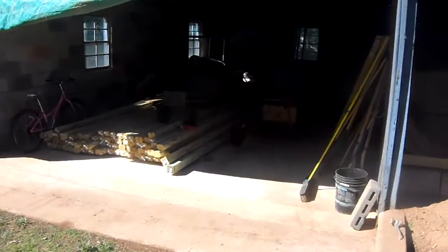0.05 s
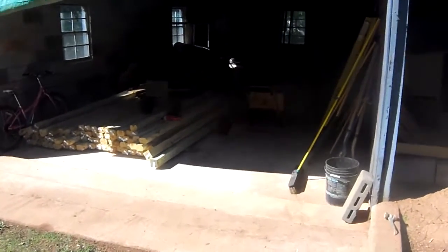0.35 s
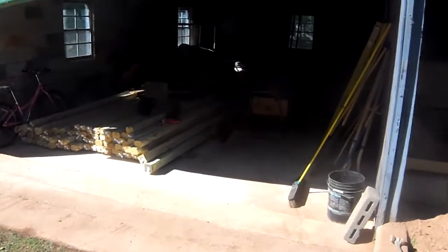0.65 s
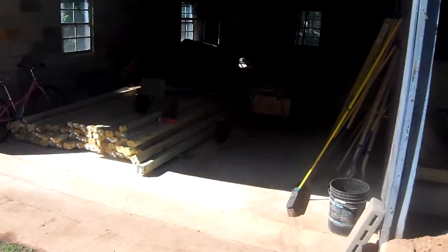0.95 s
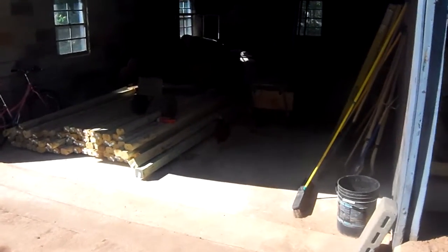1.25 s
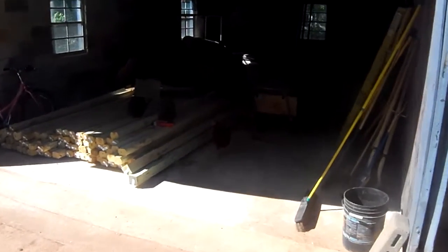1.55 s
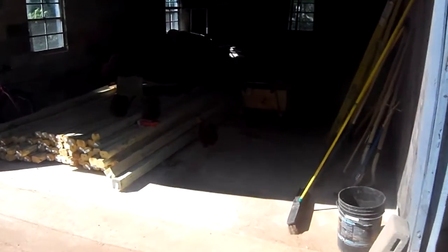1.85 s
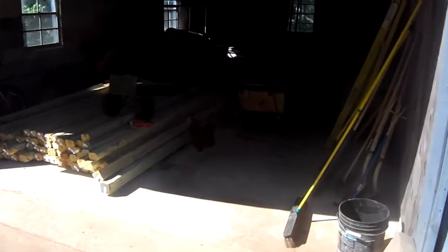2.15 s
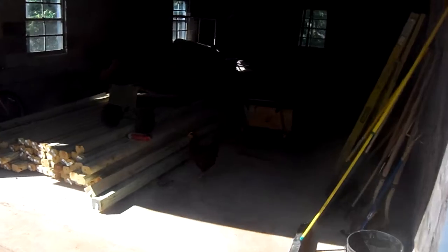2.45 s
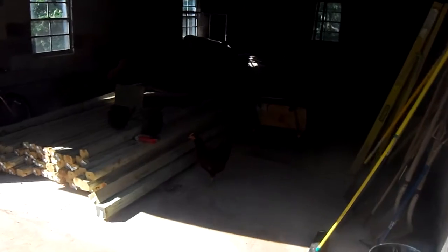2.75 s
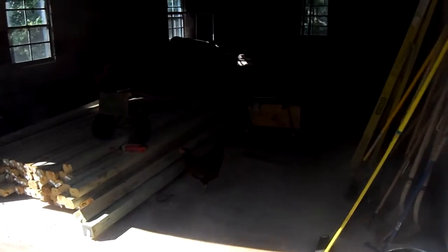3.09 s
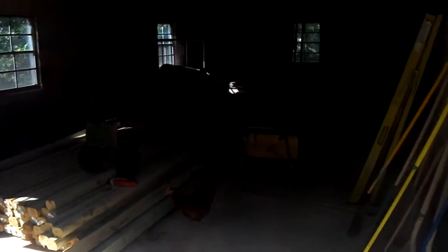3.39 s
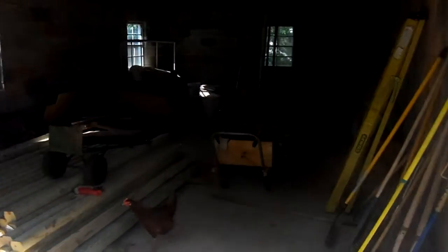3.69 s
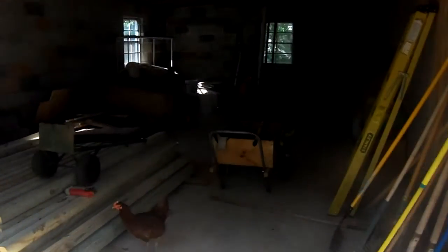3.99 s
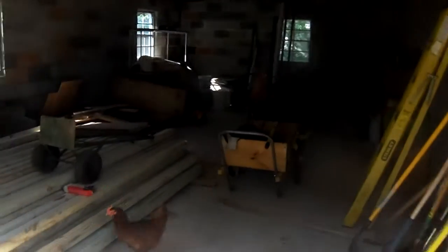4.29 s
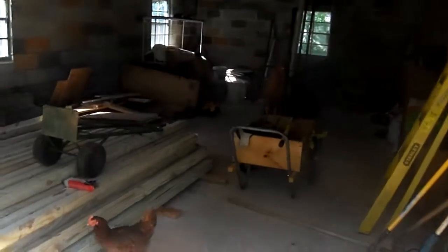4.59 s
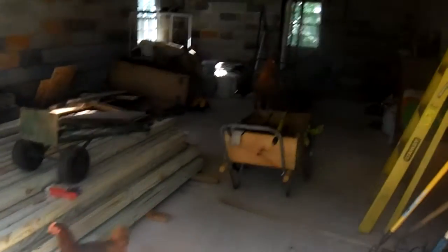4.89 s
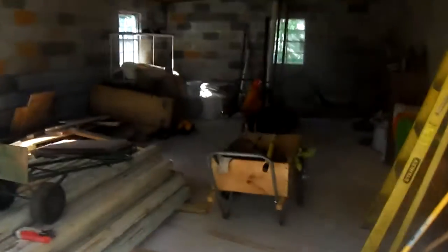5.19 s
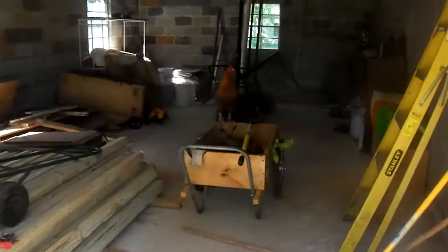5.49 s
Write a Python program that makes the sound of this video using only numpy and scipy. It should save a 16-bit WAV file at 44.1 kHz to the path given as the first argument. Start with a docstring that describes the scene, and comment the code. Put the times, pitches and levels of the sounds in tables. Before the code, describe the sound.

A hen clucks right at the start, then lets out a loud, drawn-out squawk from about 0.1 to 0.5 seconds, harsh at first, clearing to a tone and cracking upward at its end. A lull follows, with one soft cluck near 0.8 seconds. From 1.7 seconds she scolds in an even run of about five clucks a second, growing hoarser, louder from around 3.7 seconds, and continuing until the end at about 5.6 seconds. A second hen gives a short, level wail from 3.4 to 3.7 seconds, with a soft low note on either side. The concrete-block shed adds a short echo to the birds. Thin, dry ticks of grit come now and then, clearest near the end. Between 0.9 and 2.5 seconds a few distant songbirds chirp very faintly, and a quiet outdoor hush lies underneath throughout.

```python
"""Hens in a concrete-block shed, each voice a vibrating syrinx ringing through throat and beak.
One clucks, then lets out a long squawk that starts harsh, clears and cracks upward at its end.
After a lull with one more cluck, she scolds from 1.7 s: five hoarse clucks a second, louder later on.
At 3.4 s a second hen joins with a short, level wail. All along the walls answer, grit ticks now and
then, and a few distant songbirds chirp over a faint outdoor hush."""
import sys
import numpy as np
from scipy import signal
from scipy.fft import rfft, irfft, next_fast_len
from scipy.io import wavfile
from scipy.ndimage import uniform_filter1d, map_coordinates

SR = 44100
rng = np.random.default_rng(int(sys.argv[2]) if len(sys.argv) > 2 else 0)


def store_wav(level_fs):
    """Save 16-bit WAV to argv[1]."""
    pcm = np.round(np.clip(np.atleast_2d(level_fs), -1, 1) * 32767)
    wavfile.write(sys.argv[1], SR, pcm.T.astype(np.int16))


N = 253134
TOP_HZ = 14200

SQUAWK_S, PUSH_S, CRACK_S, SQUAWK_END_S = .132, .452, .477, 0.52
NOTE_HZ, NOTE_RISE_HZ_PER_S, NOTE_DB = 532.5, 108, -27.5
BURST_PEAK_S, BURST_HZ, BURST_DB = .031, 75.5, 11  # opening burst: time to peak, added pitch and level
PUSH_RISE_S, PUSH_HZ, PUSH_DB, PUSH_OPEN_DB = 0.0098, 24.2, 7, 2.5  # second push and what it adds
CRACKED_HZ, CRACKED_DB = 690, 1.5  # the crack: landing pitch, added level
BEAK_OPEN_DB, BEAK_CLOSE_DB_PER_S, BEAK_SHUT_DB = 2, 138, -22.5  # the mids dull as the beak closes
RASP_DB, RASP_FADE_DB_PER_S = -12.5, 44
# throat resonances that colour the squawk: f/Hz, width/Hz, level/dB
SQUAWK_FORMANTS = [(640, 162, 7), (1215, 570, -3.5), (1704, 235, 2.5), (2430, 350, -18), (2730, 500, -7.5),
                   (3410, 320, -6), (3720, 380, -8), (4920, 210, -13.5), (6100, 2100, -27.5),
                   (8800, 1000, -34.5), (11100, 2100, -30.5)]


def squawk(bounce_s=(.0019, .0027), attack_s=0.00058, release_s=0.014, snap_s=0.0048):
    """A harsh burst settles on a clean note, which rises and cracks upward under a second push."""
    t = np.arange(SQUAWK_S, SQUAWK_END_S + .05, 1 / SR)
    age = t - SQUAWK_S
    burst = (age / BURST_PEAK_S * np.exp(1 - age / BURST_PEAK_S)) ** 1.577
    harsh = 1 - after(age, .064, 0.0194)  # the membranes flap chaotically, then lock
    push, cracked = after(t, PUSH_S, PUSH_RISE_S), after(t, CRACK_S, snap_s)
    note = NOTE_HZ + NOTE_RISE_HZ_PER_S * age + BURST_HZ * burst * harsh + PUSH_HZ * push ** 2
    pitch = (note + (CRACKED_HZ - note) * cracked) * (1 + .0015 * wobble(len(t), 50))
    rough = np.clip(.022 + 0.86 * harsh + .38 * cracked, 0, 1) ** 1.5
    gate = (1 - np.exp(-age / attack_s)) * (1 - after(t, SQUAWK_END_S, release_s))
    level = amp(NOTE_DB + BURST_DB * burst + PUSH_DB * push + CRACKED_DB * cracked) * gate
    open_db = np.maximum(BEAK_OPEN_DB - BEAK_CLOSE_DB_PER_S * age, BEAK_SHUT_DB) + PUSH_OPEN_DB * push
    call = resonate(syrinx(pitch, rough, jitter=0.053), SQUAWK_FORMANTS, low_hz=525)
    overtones = filtered(call, lambda hz: above(hz, 2900, order=4))
    # the beak rings as it opens for the second push
    ring = amp(-10) * unit(resonate(overtones, [(2913, 250, 0)])) * push * (1 - cracked)
    # the floor bounce shifts as she moves her head, so single overtones swell and fade
    samples = np.arange(len(call))
    bounce = np.interp(samples - np.linspace(*bounce_s, len(call)) * SR, samples, overtones)
    body, bright, top = map(unit, registers(call + .6 * bounce, 2450, 4500))
    rasp = amp(RASP_DB - RASP_FADE_DB_PER_S * age) * top
    out = np.zeros(N)
    add(out, SQUAWK_S, level * (body + ring + amp(open_db) * bright + rasp))
    return out


# cluck cues, one push of air each: t/s, level/dB, beak opening/dB, length/s
CLUCK_CUES = [(-0.018, -18.5, -1, 0.034), (0.078, -36, -7.5, 0.06), (0.75, -28, -6, 0.022),
              (1.732, -30.5, -4.5, .035), (1.934, -27.5, 0, 0.028), (2.131, -28, -2.5, 0.035),
              (2.321, -34, 1, 0.051), (2.514, -30, -1.5, 0.051), (2.713, -29.5, 2.5, .043),
              (2.908, -31, 2.5, 0.05), (3.11, -28, 1, 0.041), (3.313, -32, -0.5, 0.06),
              (3.527, -29, 3, 0.045), (3.726, -23, 5, 0.03), (3.932, -26, 2.5, 0.049),
              (4.135, -24, 2.5, 0.042), (4.349, -21, 0, 0.035), (4.55, -23, 1.5, 0.04),
              (4.753, -22, 0.5, 0.036), (4.947, -27, 0, 0.05), (5.141, -24.5, 1, 0.052),
              (5.336, -22.5, 0.5, 0.037), (5.538, -25, 2.5, 0.041)]


def clucking(hoarsest=0.551, hoarsen_s=1.51):
    """The first clucks are clear-toned; the scolding after the squawk grows hoarse."""
    out = np.zeros(N)
    for s, db, open_db, length in CLUCK_CUES:
        rough = hoarsest * (1 - np.exp(-max(s, 0) / hoarsen_s))
        add(out, s, amp(db) * cluck(open_db, rough, length))
    return out


# throat resonances that colour a cluck: f/Hz, width/Hz, level/dB
CLUCK_FORMANTS = [(245, 98, -10), (504, 170, -8), (792, 188, 3), (990, 200, -21), (1167, 420, -5),
                  (1955, 166, -2), (2390, 308, -6.5), (3383, 920, -13), (5365, 570, -22.5),
                  (6810, 220, -23), (8060, 1470, -28), (11500, 2600, -39)]


def cluck(open_db, rough, length, base_hz=235.54, swell_s=0.032, fade_s=0.0094):
    """One push of air: the pitch scoops up as it swells, and the top closes first."""
    t = np.arange(int(.14 * SR)) / SR
    effort = (0.39 + 0.77 * np.minimum(t / swell_s, 1) ** 1.6) / (1 + np.exp((t - length) / fade_s))
    note_hz = base_hz * (1 + 0.0139 * rng.standard_normal())
    scoop = 1.12 - .3 * np.exp(-t / .028) - 0.798 * t
    pitch = note_hz * (scoop + 0.0603 * rough * wobble(len(t), 59.4))
    stretch = 1 + 0.024 * rng.standard_normal()  # the neck is held differently each time
    throat = [(centre * stretch, width, db) for centre, width, db in CLUCK_FORMANTS]
    voice = resonate(syrinx(pitch, rough, jitter=0.0533), throat)
    body, bright, top = registers(unit(early_echoes(voice, share=0.8)), 1420, 4270)
    # the third harmonic sings on the main resonance, most in a clear voice with the beak nearly shut
    core_hz = 3 * pitch * (1 + 0.032 * wobble(len(t), 111))
    core = amp(2 - 7 * rough - 1.56 * open_db) * np.sin(2 * np.pi * np.cumsum(core_hz) / SR)
    upper = amp(1) * effort ** 0.33 * bright + amp(0.2) * effort ** .5 * top
    return effort * (unit(body + core) + amp(open_db) * upper)


WAIL_S, FLIP_UP_S, FLIP_DOWN_S, WAIL_END_S = 3.388, 3.418, 3.715, 3.735
WAIL_LOW_HZ, WAIL_HELD_HZ = 270.8, 313.8
WAIL_DB, WAIL_ACCENT_DB, WAIL_SETTLE_S = -27, 5.5, 0.059  # held level, opening accent and its decay
# soft notes either side of the wail: t/s, f/Hz, level/dB, length/s
MURMUR_CUES = [(3.268, 261.8, -36.5, 0.053), (3.865, 236, -35.5, 0.059)]


def wail(attack_s=0.0028, release_s=0.024, snap_s=0.0073):
    """Between two murmurs, the second hen flips up to a level note and back, rough at each flip."""
    t = np.arange(WAIL_S, WAIL_END_S + .03, 1 / SR)
    age = t - WAIL_S
    held = after(t, FLIP_UP_S, snap_s) - after(t, FLIP_DOWN_S, snap_s)
    flipping = sum(np.exp(-((t - s) / 0.032) ** 2) for s in (FLIP_UP_S, FLIP_DOWN_S))
    pitch = WAIL_LOW_HZ + (WAIL_HELD_HZ - WAIL_LOW_HZ) * held
    voice = second_voice(pitch, rough=0.0026 + 0.19 * flipping)
    gate = (1 - np.exp(-age / attack_s)) * (1 - after(t, WAIL_END_S, release_s))
    level = amp(WAIL_DB + WAIL_ACCENT_DB * np.exp(-age / WAIL_SETTLE_S)) * gate
    out = np.zeros(N)
    add(out, WAIL_S, level * voice)
    for s, pitch_hz, db, length in MURMUR_CUES:
        n = int(length * SR)
        add(out, s, amp(db) * np.hanning(n) * second_voice(np.full(n, pitch_hz), rough=0.62))
    return out


# the second hen's throat resonances: f/Hz, width/Hz, level/dB
WAIL_FORMANTS = [(650, 170, -21), (1024, 130, 7.5), (1261, 53, 0.5), (1830, 240, -17.5), (2155, 48, -12),
                 (3150, 490, -22.5), (3970, 290, -29), (5270, 1500, -33.5), (7150, 4100, -40)]


def second_voice(pitch, rough, rasp_db=-14.5, waver=0.0055):
    """A wavering low voice; on the held note, harmonics three and four sit by the main resonances."""
    pitch = pitch * (1 + waver * wobble(len(pitch), 57.5))
    voice = resonate(syrinx(pitch, rough, jitter=0.022), WAIL_FORMANTS, low_hz=656)
    call = steady(early_echoes(voice, share=0.48))
    # hoarse overtones: the membranes flutter from cycle to cycle
    overtones = filtered(call, lambda hz: above(hz, 1820))
    flutter = unit(amp(-wobble(len(call), 250)))
    return call - overtones + amp(rasp_db) * unit(overtones) * flutter


def syrinx(pitch, rough, jitter):
    """Vibrating membranes buzz; roughness (0-1) shakes their pulses and turns them into puffs of air."""
    n, rough = len(pitch), np.clip(rough, .001, 1)
    phase = 2 * np.pi * np.cumsum(pitch * (1 + jitter * np.sqrt(rough) * wobble(n, 350))) / SR
    harmonics = int(TOP_HZ / np.mean(pitch))
    pulses = unit(np.sin((harmonics + .5) * phase) / np.sin(phase / 2) - 1)  # all equally strong
    puffs = unit(rng.standard_normal(n) * np.exp(0.5 * np.cos(phase)))
    return np.sqrt(1 - rough) * pulses + np.sqrt(rough) * puffs


def early_echoes(x, share, latest_s=.016, count=7):
    """The floor, lumber and tools around a bird add a few quick reflections to her voice."""
    echoes = np.zeros(SR // 20)
    lags = (rng.uniform(.001, latest_s, count) * SR).astype(int)
    echoes[lags] = share * rng.choice([-1, 1], count) / np.sqrt(count)
    return x + signal.fftconvolve(x, echoes)[:len(x)]


# reverb decay of the block walls: f/Hz, t60/s
WALL_DECAY = [(200, 0.54), (800, 0.34), (2500, 0.4), (6000, 0.33), (12000, 0.18)]
# standing waves between them: f/Hz, width/Hz, level/dB
STANDING_WAVES = [(485, 270, -21), (710, 170, -16), (978, 190, -2)]


def shed(x, predelay_s=.006):
    """The walls' diffuse tail shifts as the birds move; a few standing waves ring on."""
    out, step = np.zeros(N), SR // 3
    for start in range(0, N, step):  # crossfade into a fresh tail at each step
        hz, t, noise = signal.stft(rng.standard_normal(SR // 2), SR, nperseg=256)
        decay = amp(-60 * t / along(WALL_DECAY, hz)[:, None])
        tail = signal.istft(noise * decay, SR, nperseg=256)[1]
        crossfade = np.sin(np.linspace(0, np.pi, 2 * step))
        part = np.pad(x, (step, 2 * step))[start:start + 2 * step] * crossfade
        add(out, (start - step) / SR + predelay_s, signal.fftconvolve(part, tail / np.linalg.norm(tail)))

    def ring(hz):
        return sum(amp(db) * 1j * hz * width / (centre ** 2 - hz ** 2 + 1j * hz * width)
                   for centre, width, db in STANDING_WAVES)
    return filtered(out, lambda hz: 1 + ring(hz))


# dry ticks of grit on the floor: t/s, peak level/dB
TICK_CUES = [(0.387, -30.5), (1.017, -42.5), (1.4337, -43.5), (1.7854, -42), (4.912, -33.5), (5.09, -38.5),
             (5.383, -25.5), (5.6125, -20.5)]
# resonances of a grain: f/Hz, width/Hz, level/dB
GRIT_MODES = [(5650, 3600, 2.5), (9600, 5100, -11.5)]


def grit_ticks(t60_s=0.013):
    """Each grain of grit gives one short, thin crack."""
    out, t = np.zeros(N), np.arange(SR // 20) / SR
    for s, db in TICK_CUES:
        crack = resonate(rng.standard_normal(len(t)) * amp(-60 * t / t60_s), GRIT_MODES, low_hz=5000)
        add(out, s, amp(db) * crack / np.abs(crack).max())
    return out


# songbird chirps: t/s, length/s, start f/Hz, end f/Hz, level/dB
CHIRP_CUES = [(.88, 0.14, 3820, 4740, -58.5), (1.08, 0.053, 5130, 4300, -61),
              (1.633, 0.061, 3800, 4070, -64), (2.063, 0.078, 3550, 3620, -50.5),
              (2.464, 0.067, 5400, 4930, -59)]


def songbirds():
    """Thin, warbling glides from far away."""
    out = np.zeros(N)
    for s, length, start_hz, end_hz, db in CHIRP_CUES:
        n = int(length * SR)
        hz = np.linspace(start_hz, end_hz, n) + 0.39 * (end_hz - start_hz) * wobble(n, 270)
        add(out, s, amp(db) * np.hanning(n) * np.sin(2 * np.pi * np.cumsum(hz) / SR))
    return out


# tone of the outdoor air: f/Hz, relative level/dB
AIR_SPECTRUM = [(25, 3.5), (85, -2), (180, -4), (350, -10.5), (700, -16), (1400, -21), (3500, -21),
                (6000, -26.5), (13500, -29.5)]


def hush(level_db=-53):
    """A bed of outdoor air with a gently stirring level."""
    air = unit(filtered(rng.standard_normal(N), lambda hz: amp(along(AIR_SPECTRUM, hz))))
    stir = amp(.9 * wobble(N, 6))
    return air * stir * amp(level_db)


def resonate(x, modes, low_hz=330):
    """x through resonances that ring only after they are struck; a small body radiates no bass."""
    size = 4096
    hz = np.fft.rfftfreq(size, 1 / SR)
    gain = sum(amp(db) / (1 + (2 * (hz - centre) / width) ** 2) for centre, width, db in modes)
    cepstrum = irfft(np.log(gain * above(hz, low_hz, order=3) + 1e-6))
    cepstrum[1:size // 2] *= 2  # fold to minimum phase: no pre-ring
    cepstrum[size // 2 + 1:] = 0
    return signal.fftconvolve(x, irfft(np.exp(rfft(cepstrum))))[:len(x)]


def registers(x, low_hz, high_hz):
    """Split a call into body, bright mids and rasping top."""
    upper = filtered(x, lambda hz: above(hz, low_hz))
    top = filtered(x, lambda hz: above(hz, high_hz))
    return x - upper, upper - top, top


def filtered(x, response):
    """x through an EQ curve."""
    m = next_fast_len(len(x) + 8192)
    return irfft(rfft(x, m) * response(np.fft.rfftfreq(m, 1 / SR)), m)[:len(x)]


def above(hz, edge_hz, order=16):
    """The gain of a high-pass."""
    return 1 - 1 / (1 + (hz / edge_hz) ** order)


def along(points, hz):
    """(f/Hz, value) points read on a log axis."""
    f, v = np.transpose(points)
    return np.interp(np.log(hz + 1), np.log(f + 1), v)


def after(t, s, width):
    """A smooth switch from 0 to 1 at time s."""
    return .5 + .5 * np.tanh((t - s) / width)


def wobble(n, rate):
    """A smooth random curve of n samples, rate knots a second."""
    return map_coordinates(rng.standard_normal(int(n * rate / SR) + 4), [np.arange(n) * rate / SR])


def steady(x, window_s=.03):
    """x held at rms 1 throughout, so that the hen's effort alone sets its level."""
    return x / np.sqrt(np.abs(uniform_filter1d(x ** 2, int(window_s * SR))) + 1e-12)


def unit(x):
    """x at rms 1."""
    return x / np.sqrt(np.mean(x ** 2) + 1e-20)


def amp(db):
    """Decibels to gain."""
    return 10 ** (np.asarray(db) / 20)


def add(track, s, x):
    """Mix x into the track from time s."""
    start = round(s * SR)
    part = x[max(-start, 0):N - start]
    track[max(start, 0):][:len(part)] += part


def scene():
    """The clucking hen is deep in the shed and sounds wettest; the songbirds outside stay dry."""
    clucks, long_call, answer, grit = clucking(), squawk(), wail(), grit_ticks()
    # the squawk's treble is beamed straight out of the beak, so mostly its body reaches the walls
    spill = amp(-7) * filtered(long_call, lambda hz: 1 - .6 * above(hz, 3000, order=4))
    walls = shed(amp(-1.0) * clucks + spill + amp(-4.5) * (answer + grit))
    return (clucks + long_call + answer + grit + walls + songbirds() + hush())[None]


def record(dry):
    """A brick-wall high cut on the whole mix."""
    return filtered(dry[0], lambda hz: hz < TOP_HZ)[None]


dry = scene()
out = record(dry)
store_wav(out)
```